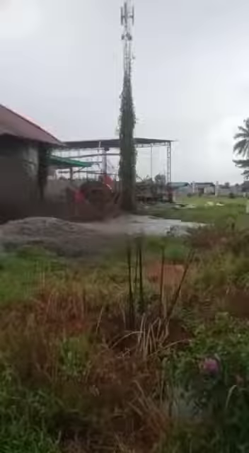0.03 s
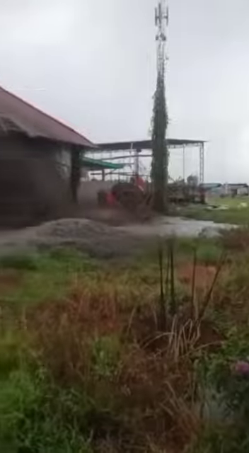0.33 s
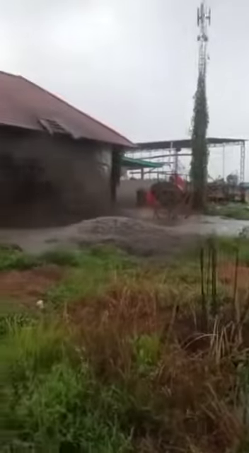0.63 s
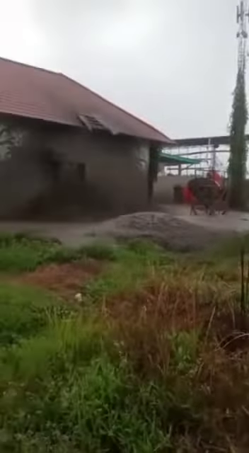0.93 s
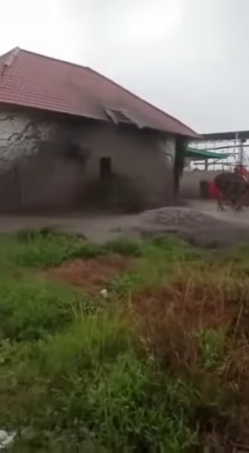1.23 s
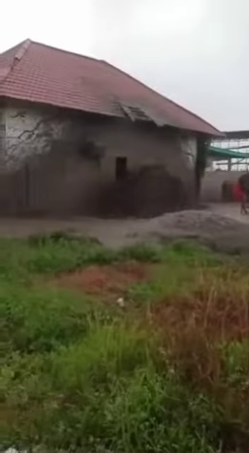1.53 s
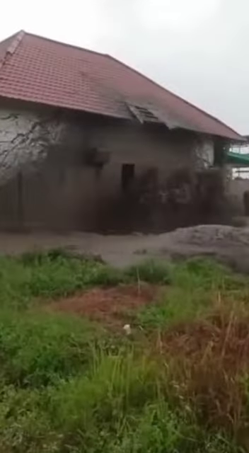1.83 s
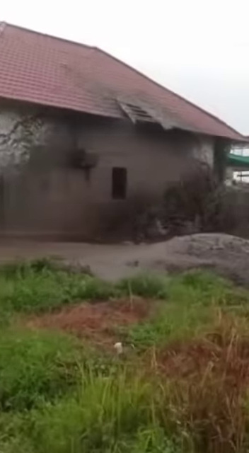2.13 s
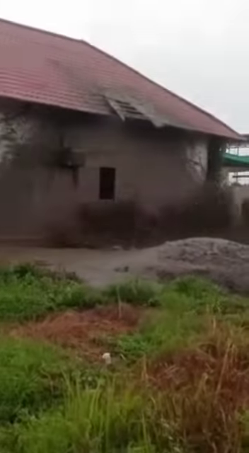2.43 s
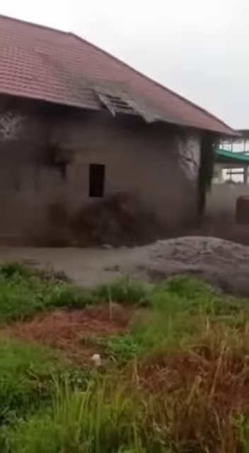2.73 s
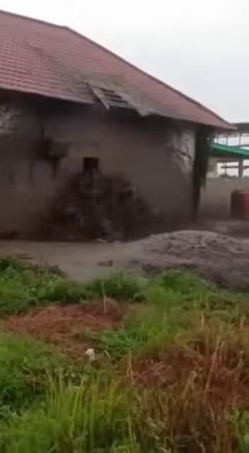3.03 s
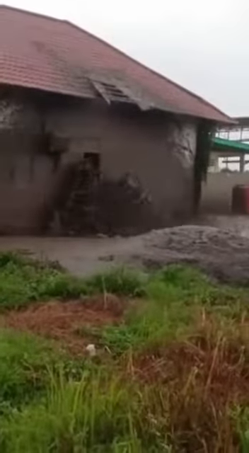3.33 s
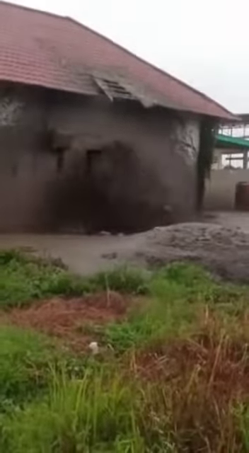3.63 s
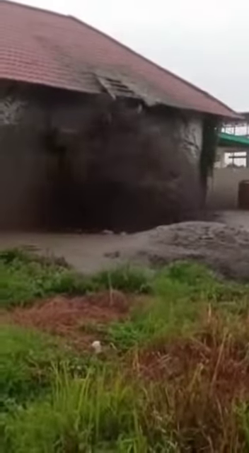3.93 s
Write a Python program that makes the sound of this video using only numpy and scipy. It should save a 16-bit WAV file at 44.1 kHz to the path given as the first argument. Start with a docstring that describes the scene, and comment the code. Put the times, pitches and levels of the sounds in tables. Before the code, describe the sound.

Mud and gas blast out of the ground with a rumbling, engine-like roar and wet spatter.

```python
"""Mud blowout beside a house

Gas and mud blast out of the ground, heard from across a field; the sound cuts in abruptly.
The jet roars and crackles, slugs of mud thud in the vent, spray hisses and spatters on the wall.
The flow surges three times; the path over the ground gives the roar a hollow, engine-like colour.
One mono microphone, which swings round to face the wall after the first surge."""
import sys
import numpy as np
from scipy import signal
from scipy.fft import rfft, irfft, next_fast_len
from scipy.io import wavfile

SR = 44100
rng = np.random.default_rng(int(sys.argv[2]) if len(sys.argv) > 2 else 0)


def to_wav(sig):
    """Store sig (one row per channel, or 1-D mono) as 16-bit WAV at the path in sys.argv[1].

    Samples outside -1..1 are clipped; the rate is SR.
    """
    pcm = np.clip(np.atleast_2d(sig), -1, 1) * 32767
    pcm = np.round(pcm).astype(np.int16)
    wavfile.write(sys.argv[1], SR, pcm.T)  # frames by channels


N = 176400
TIME_S = np.arange(N) / SR


def from_db(db):
    """Decibels to gain."""
    return 10 ** (np.asarray(db) / 20)


def unit_rms(x):
    """Scale to rms 1."""
    return x / np.sqrt(np.mean(x ** 2) + 1e-20)


def fader(levels, trim_db):
    """Gain at every sample from rows of time_s, level_db, plus a trim."""
    return from_db(trim_db + np.interp(TIME_S, *np.transpose(levels)))


def drift(rate_hz):
    """Slow random wander with a spread of about 1."""
    hop, settle = 40, 2000
    pole = np.exp(-2 * np.pi * rate_hz * hop / SR)
    noise = rng.standard_normal(N // hop + settle + 2)
    slow = signal.lfilter([1], [1, -2 * pole, pole * pole], noise)[settle:]
    return np.interp(np.arange(N) / hop, np.arange(len(slow)), unit_rms(slow))


def impacts(per_s, spread_db):
    """Random one-sided clicks, mostly small and a few large; rms 1."""
    hits = rng.random(N) < per_s / SR
    clicks = hits * from_db(spread_db * np.minimum(rng.exponential(1, N), 4))
    return unit_rms(clicks - clicks.mean())


def coloured(x, spectrum, band):
    """Shape x to a spectrum within the named band, with a minimum-phase filter; rms 1."""
    # Borders of the five bands, low to high: edge_hz
    edges_hz = [20, 500, 1730, 3920, 8200, 16000]
    index = ["rumble", "roar", "rasp", "spray", "mist"].index(band)
    low_hz, high_hz = edges_hz[index:index + 2]
    size = next_fast_len(N + SR // 2)
    hz = np.maximum(np.arange(size // 2 + 1) * SR / size, 1)
    points_hz, points_db = np.transpose(spectrum)
    gain = from_db(np.interp(np.log(hz), np.log(points_hz), points_db))
    gain /= np.sqrt((1 + (low_hz / hz) ** 40) * (1 + (hz / high_hz) ** 40))
    # Folding the cepstrum makes the filter ring only after each click.
    cepstrum = irfft(np.log(gain + 1e-5), size)
    cepstrum[1:size // 2] *= 2
    cepstrum[size // 2 + 1:] = 0
    response = np.exp(rfft(cepstrum, size))
    return unit_rms(irfft(rfft(x, size) * response, size)[:N])


def microphone_turn(x, before, after, band, middle_s=1.44, length_s=0.95):
    """The colour crossfades as the microphone swings round to face the wall."""
    turned = np.clip((TIME_S - middle_s) / length_s + .5, 0, 1)
    return (1 - turned) * coloured(x, before, band) + turned * coloured(x, after, band)


def vent():
    """Slugs of mud burst in the vent over a turbulent rumble."""
    # Strength of the rumble: time_s, level_db
    rumble_level = [(0.2, -25), (0.33, -28.5), (0.4, -26.5), (0.65, -28.5), (0.88, -24.5), (1.03, -24),
                    (1.19, -26), (1.3, -25.3), (1.53, -26), (1.66, -25), (1.72, -27.5), (2.06, -26.7),
                    (2.29, -25), (2.55, -24.5), (2.62, -25.5), (2.7, -26), (2.84, -28), (2.93, -25.5),
                    (3.05, -26), (3.27, -25), (3.33, -27.5), (3.52, -25.5), (3.6, -25.5), (3.68, -23.7),
                    (3.97, -24.5)]
    # Its colour before and after the microphone turns: frequency_hz, gain_db
    rumble_before = [(30, -31.5), (48, -24), (65, -13.5), (85, -2.2), (110, -2), (140, -1.5), (175, 0.5),
                     (220, -4.5), (270, 1.3), (330, -4.5), (410, -8.5), (480, -12), (520, -11.5)]
    rumble_after = [(30, -30.5), (48, -19.5), (65, -16.5), (85, -3.5), (110, -0.7), (140, -1), (175, -1),
                    (220, -2.7), (270, -1.4), (330, -4.3), (410, -7.5), (480, -10.5), (520, -11)]
    bursts = rng.standard_normal(N) + from_db(-5) * impacts(per_s=80, spread_db=1.5)
    rumble = microphone_turn(bursts, rumble_before, rumble_after, "rumble")
    return fader(rumble_level, trim_db=0.21) * rumble


def jet_roar(blast):
    """The gas jet's roar, hollowed into two broad humps by its path over the ground."""
    # Strength of the jet: time_s, level_db
    roar_level = [(0.2, -23.5), (0.45, -24), (0.63, -27), (0.67, -22.5), (0.72, -26), (0.86, -23.5),
                  (0.9, -20.5), (1.03, -20.5), (1.08, -22.5), (1.15, -21.3), (1.22, -25.5), (1.48, -23),
                  (1.54, -26), (1.67, -22.5), (1.73, -27), (1.79, -22.5), (2.14, -24.5), (2.3, -21.5),
                  (2.42, -21.5), (2.48, -23.8), (2.53, -22), (2.85, -24.5), (3.05, -26.5), (3.25, -23),
                  (3.38, -27), (3.44, -21.5), (3.62, -22), (3.76, -24.5), (3.8, -22), (3.97, -22.5)]
    # Its colour from across the field: frequency_hz, gain_db
    roar_colour = [(495, -10), (538, -8), (624, -2.5), (797, -0.6), (818, 0), (947, -2), (1034, -8.5),
                   (1098, -14.5), (1227, -4.5), (1314, -1.5), (1421, -1.2), (1529, -4), (1680, -10.5),
                   (1766, -15)]
    return fader(roar_level, trim_db=-0.12) * coloured(blast, roar_colour, "roar")


def jet_rasp(blast):
    """The same turbulence and shocks rasp and crackle above the roar."""
    # Strength of the rasp: time_s, level_db
    rasp_level = [(0.2, -25.5), (0.79, -25.5), (0.9, -23.5), (1.03, -21), (1.15, -23.5), (1.28, -26.5),
                  (1.45, -25.5), (1.75, -27.6), (1.93, -26), (2.24, -25), (2.35, -23), (2.56, -24),
                  (2.71, -24.5), (2.78, -24.5), (2.84, -26.3), (3.07, -28), (3.28, -26), (3.38, -28.3),
                  (3.43, -25), (3.58, -23.5), (3.65, -24), (3.7, -26), (3.97, -24.3)]
    # Its colour before and after the microphone turns: frequency_hz, gain_db
    rasp_before = [(1723, -6.5), (1790, -6.5), (2024, 1.5), (2369, 1), (2455, -4.5), (2627, -2), (2756, -2),
                   (2885, -1), (3230, -8), (3340, -7), (3700, -3.5), (3962, -18)]
    rasp_after = [(1723, -9), (1852, -2.5), (2110, 1), (2412, -3.5), (2584, 0), (2756, -5.5), (2929, -1),
                  (3101, -7), (3402, -1.5), (3445, -5.5), (3575, -1.5), (3962, -13)]
    return fader(rasp_level, trim_db=0.08) * microphone_turn(blast, rasp_before, rasp_after, "rasp")


def spray(blast):
    """Drops of mud spatter on the wall within the hiss of the jet."""
    # Strength of the spray and of its faint top treble, the mist: time_s, level_db
    spray_level = [(0.2, -33), (0.3, -35), (0.79, -37), (0.95, -33.5), (1.05, -33), (1.14, -34),
                   (1.28, -39.5), (1.37, -37), (1.63, -37), (1.76, -38), (1.97, -35), (2.1, -36),
                   (2.39, -31.5), (2.65, -33.5), (2.92, -35.5), (3.08, -38.5), (3.31, -37.5), (3.4, -38.5),
                   (3.56, -32.5), (3.77, -36.5), (3.97, -33.3)]
    mist_level = [(0.2, -72), (0.45, -73), (0.56, -70.5), (0.62, -74), (0.76, -74.5), (1.06, -72),
                  (1.34, -77.5), (1.69, -76.5), (2.6, -72.5), (3.13, -79), (3.58, -75), (3.97, -75.5)]
    # Colour of the spray before and after the turn, and of the mist: frequency_hz, gain_db
    spray_before = [(3876, 0.5), (4400, 2), (4700, -5.5), (4930, -3), (5340, -15), (5685, -15),
                    (5943, -22.5), (6288, -22.5), (6600, -24), (8010, -44), (8355, -46.5)]
    spray_after = [(3876, -4), (4221, 2.5), (4680, -2.5), (4870, -9.5), (5150, -10.5), (5943, -22.5),
                   (6288, -24), (7063, -32.5), (7924, -48.5), (8355, -50.5)]
    mist_colour = [(8200, -7), (9000, -3.5), (11000, -1), (12400, 1.5), (13400, -2), (14300, -13),
                   (15400, -16)]
    spatter = blast + from_db(-7) * impacts(per_s=1700, spread_db=1)
    hiss = microphone_turn(spatter, spray_before, spray_after, "spray")
    mist = coloured(spatter, mist_colour, "mist")
    return fader(spray_level, trim_db=0.8) * hiss + fader(mist_level, trim_db=0.1) * mist


def glugs(rise_s=0.014, decay_s=0.014, trim_db=-1.9):
    """Each large bubble rings for a few cycles, rising in pitch as it reaches the surface."""
    # The biggest gas bubbles bursting through the mud: start_s, pitch_hz, level_db
    bubbles = [(0.204, 104, -21), (0.902, 109, -20), (0.932, 106, -20.5), (1.01, 132, -19),
               (1.011, 250, -16), (1.099, 193, -20), (1.23, 271, -21.5), (1.291, 110.6, -17.5),
               (1.445, 116, -18), (1.641, 111, -22.5), (1.649, 187, -19), (1.763, 117, -23),
               (2.226, 118, -20), (2.276, 187, -21), (2.436, 136, -20), (2.65, 122, -16.5),
               (3.102, 145, -19), (3.255, 140, -22), (3.406, 172, -18.5), (3.469, 121, -21),
               (3.527, 147, -17), (3.567, 110, -18), (3.628, 245, -21.5), (3.73, 170, -16.5),
               (3.791, 123, -19.7), (3.961, 133, -19.5)]
    glide_per_s = 1.3  # as a share of the pitch
    out = np.zeros(N)
    for start_s, pitch_hz, level_db in bubbles:
        age_s = np.clip(TIME_S - start_s, 0, .5)
        swell = (1 - np.exp(-age_s / rise_s)) ** 2 * np.exp(-age_s / decay_s)
        cycles = pitch_hz * (age_s + glide_per_s * age_s * (age_s / 2 - decay_s))
        out += from_db(level_db + trim_db) * swell / swell.max() * np.sin(2 * np.pi * cycles)
    return out


def splash_gain():
    """Gain of the brief bright swells as sheets of mud slap the wall."""
    # Sheets of mud landing: crest_s, half_length_s, swell_db
    splashes = [(1.025, .012, 2), (2.609, 0.015, 3.2)]
    return from_db(sum(swell_db * np.exp(-((TIME_S - crest_s) / half_length_s) ** 2)
                       for crest_s, half_length_s, swell_db in splashes))


def whistle(pitch_hz=2595, width_hz=110, crest_s=2.49, half_length_s=0.12, level_db=-32.5):
    """At the height of the second surge the jet carries a faint breathy note."""
    band_hz = [pitch_hz - width_hz / 2, pitch_hz + width_hz / 2]
    bandpass = signal.butter(2, band_hz, "band", fs=SR, output="sos")
    tone = signal.sosfilt(bandpass, rng.standard_normal(N))
    swell = np.exp(-((TIME_S - crest_s) / half_length_s) ** 2)
    return from_db(level_db) * swell * unit_rms(tone)


def scene():
    """Turbulence and small shocks drive the jet; the whole flow sputters slightly."""
    turbulence = rng.standard_normal(N)
    shocks = from_db(-5.5) * impacts(per_s=1100, spread_db=3.0)
    blast = turbulence - shocks
    sputter = from_db(0.22 * drift(rate_hz=18))
    body = vent() + jet_roar(blast) + glugs()
    treble = (jet_rasp(blast) + spray(blast)) * splash_gain()
    return (sputter * (body + treble + whistle()))[None]


def record(dry, start_s=0.1643, fade_in_s=0.014, stopband_hz=16400):
    """The microphone opens quickly; a steep low-pass cuts the very top."""
    opening = np.clip((TIME_S - start_s) / fade_in_s, 0, 1)
    lowpass = signal.cheby2(12, 70, stopband_hz, fs=SR, output="sos")
    return signal.sosfilt(lowpass, dry * opening ** 2)


dry = scene()
out = record(dry)
to_wav(out)
```